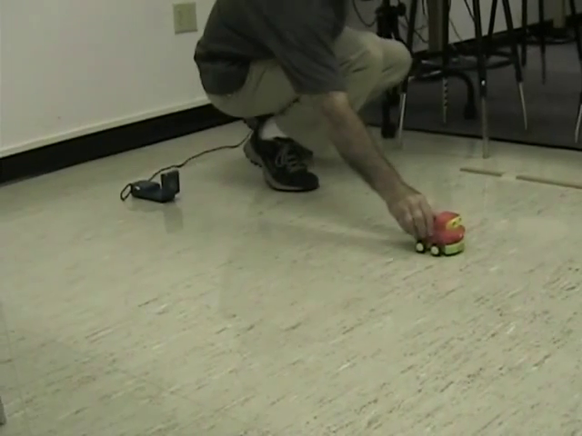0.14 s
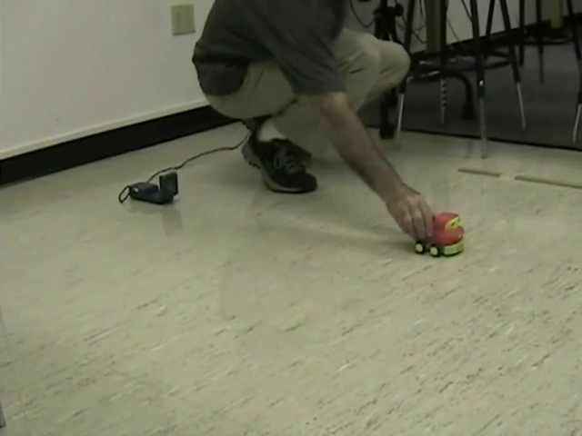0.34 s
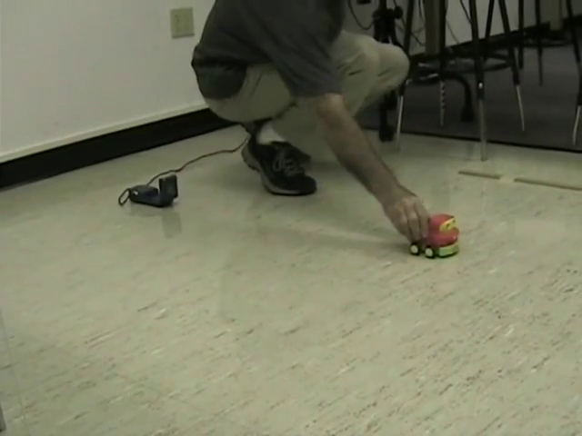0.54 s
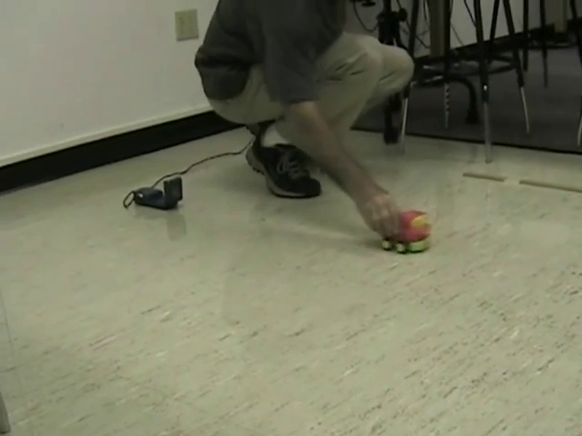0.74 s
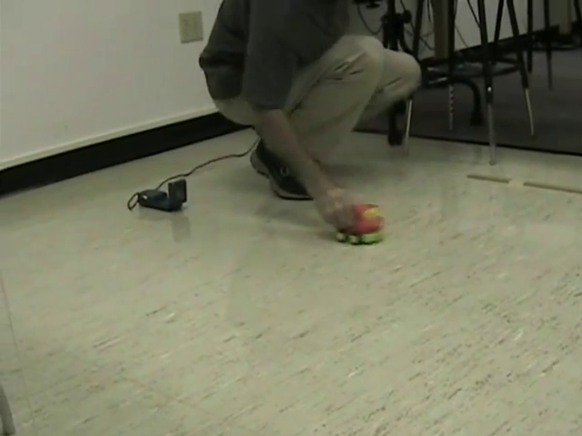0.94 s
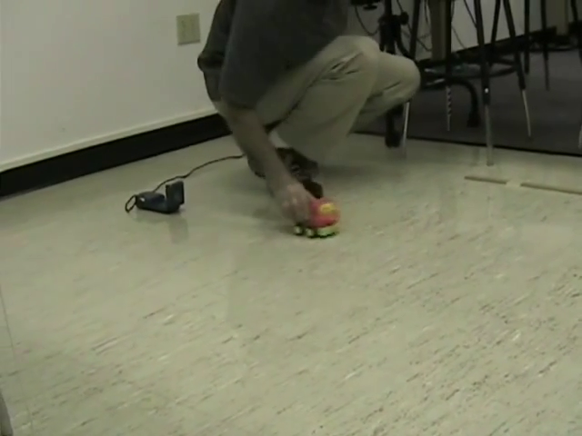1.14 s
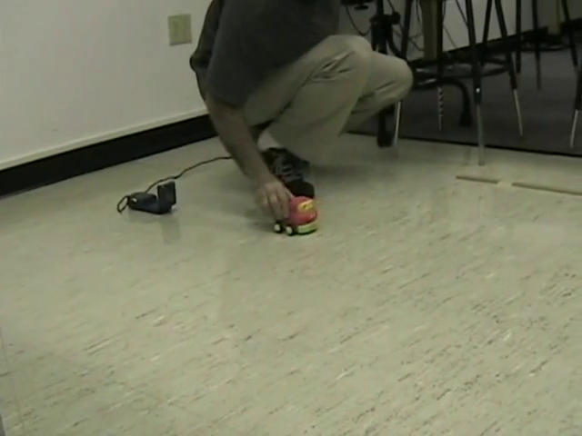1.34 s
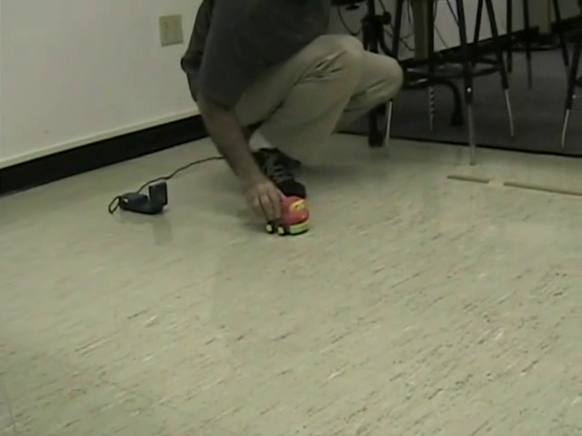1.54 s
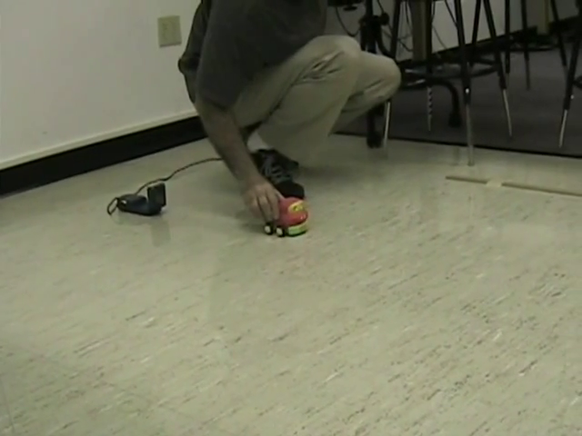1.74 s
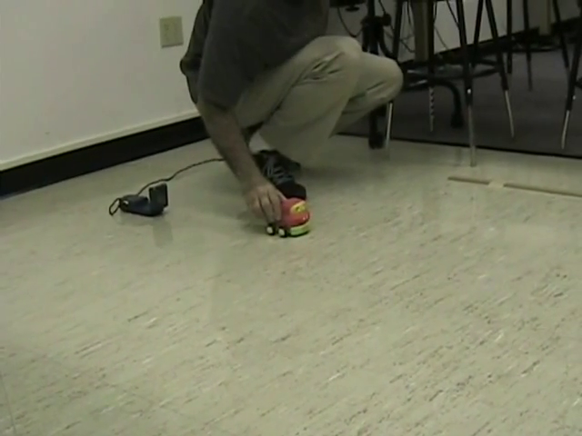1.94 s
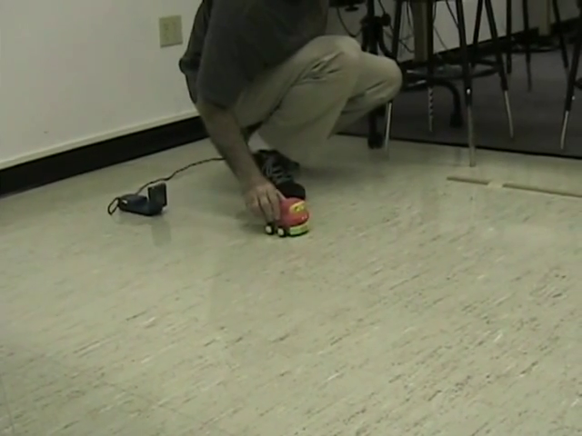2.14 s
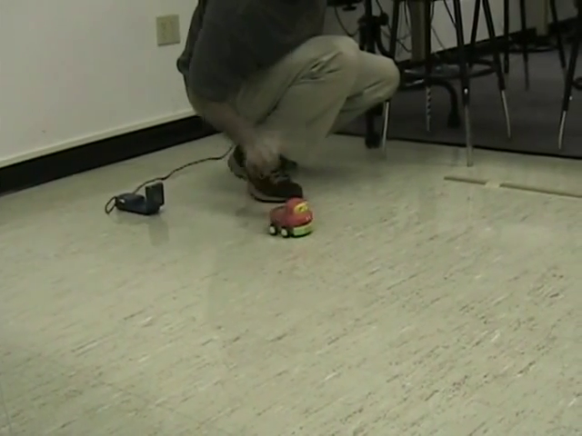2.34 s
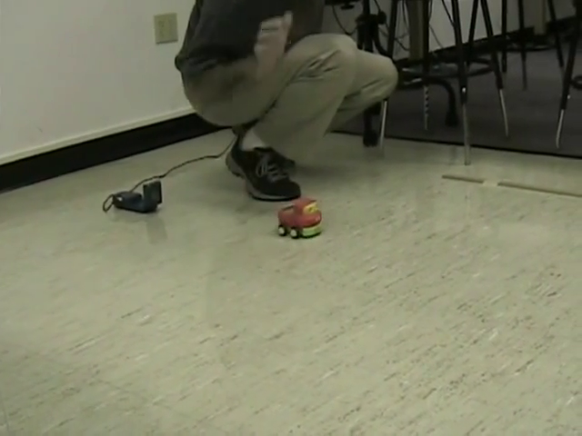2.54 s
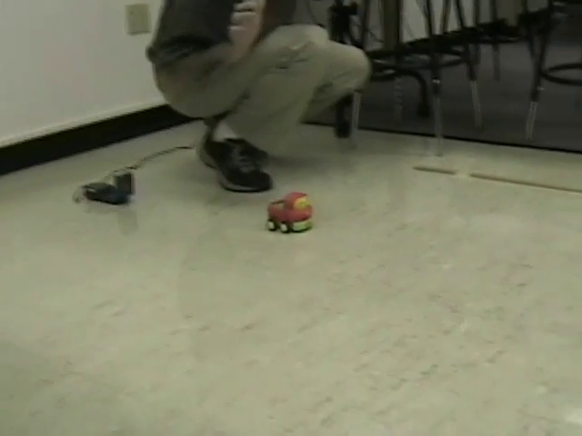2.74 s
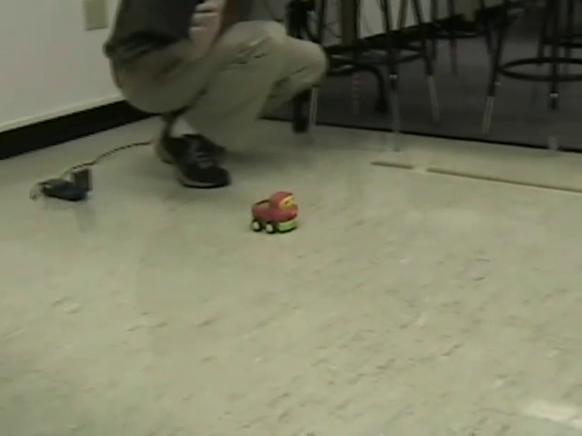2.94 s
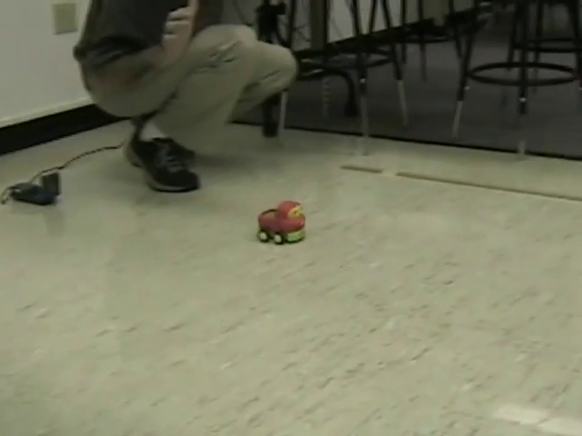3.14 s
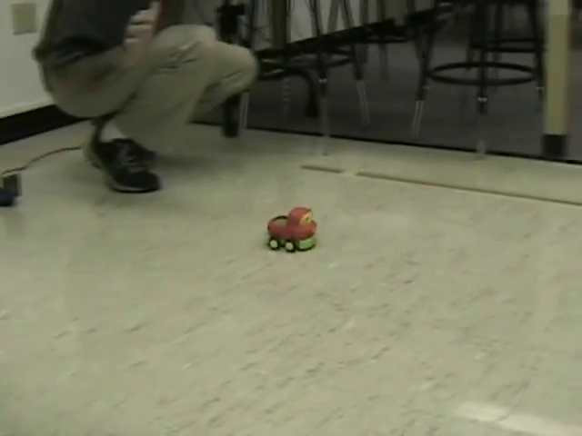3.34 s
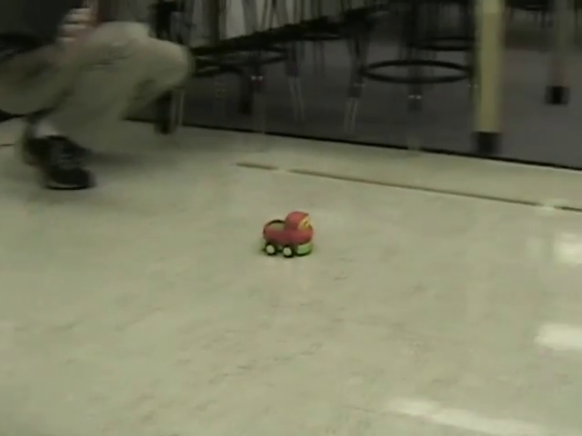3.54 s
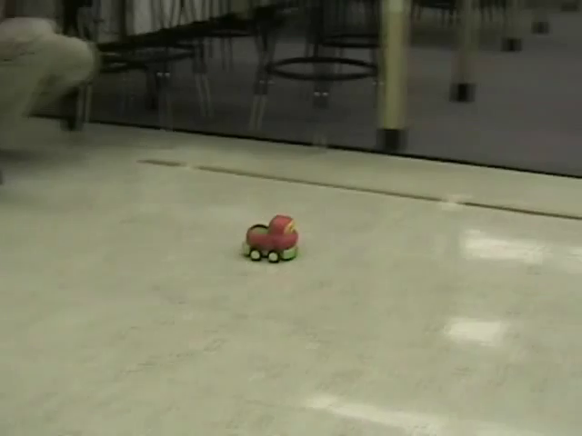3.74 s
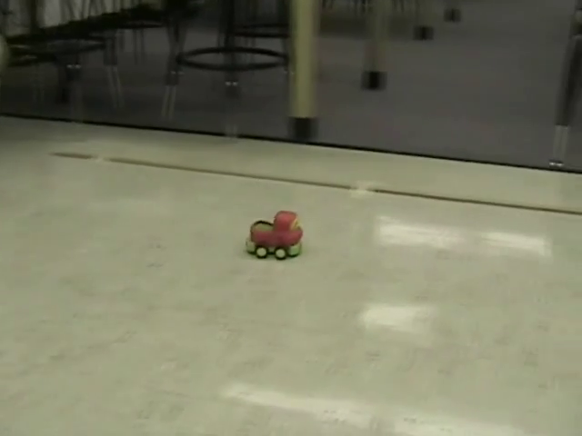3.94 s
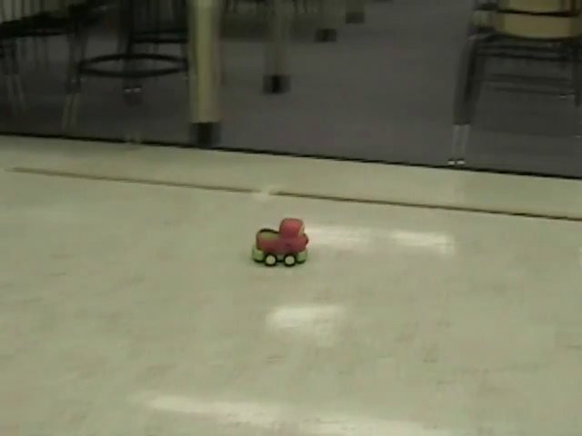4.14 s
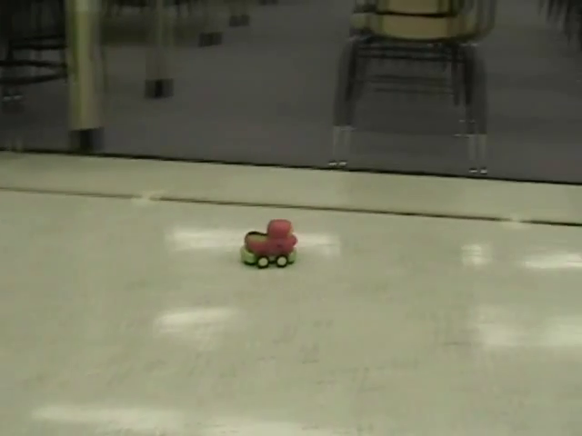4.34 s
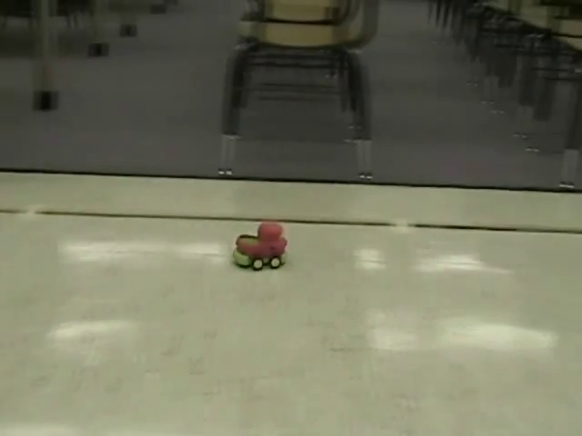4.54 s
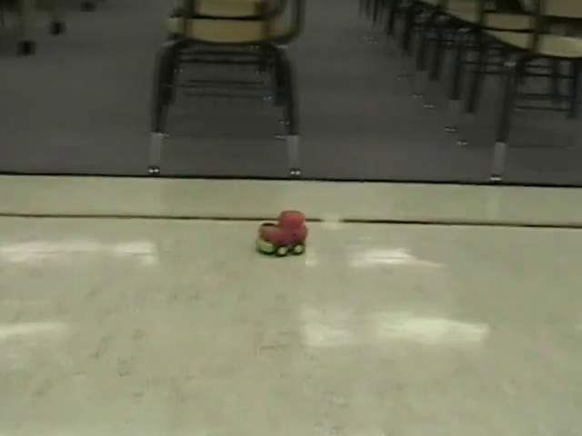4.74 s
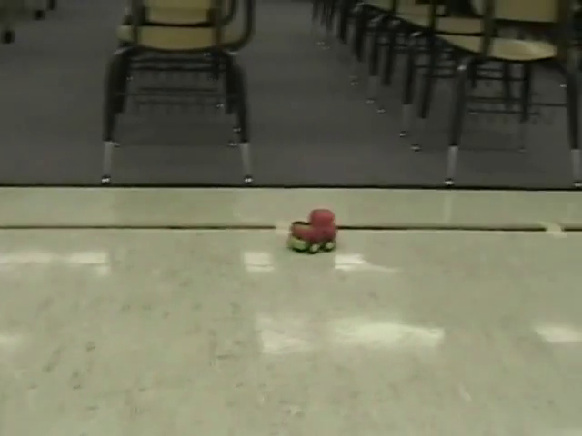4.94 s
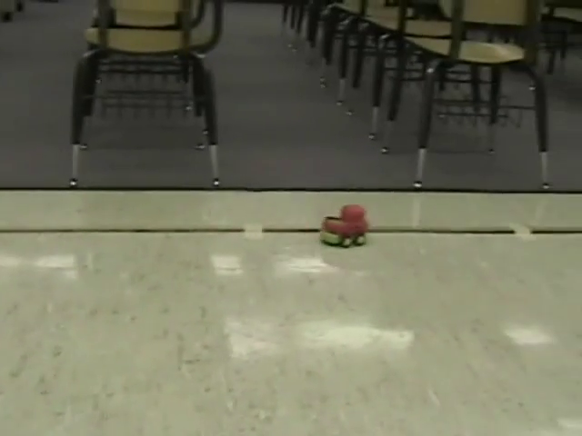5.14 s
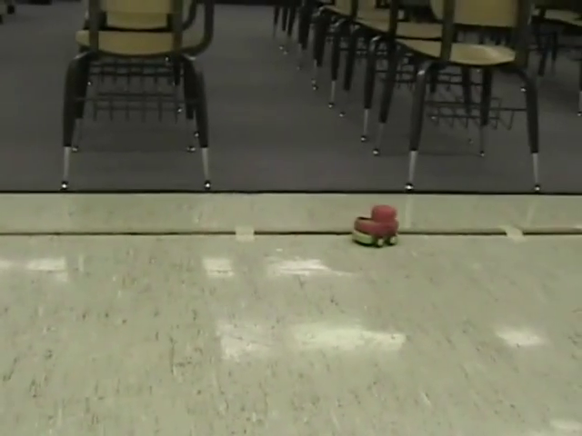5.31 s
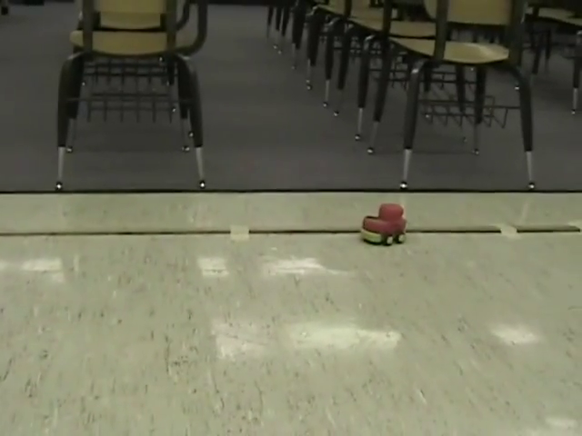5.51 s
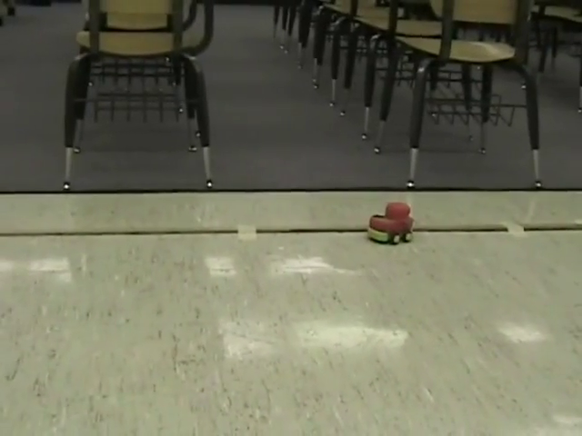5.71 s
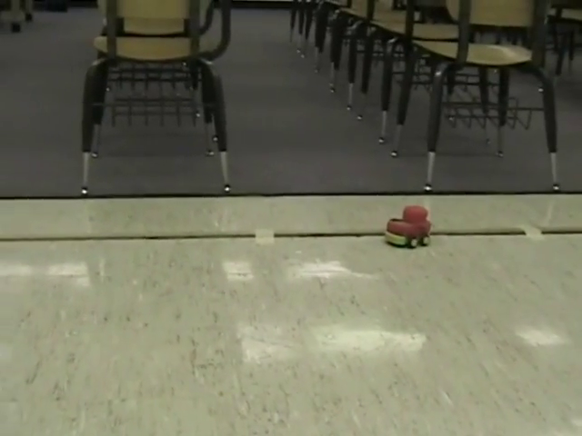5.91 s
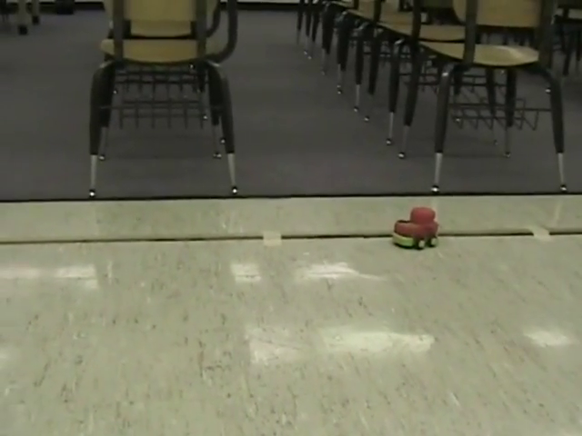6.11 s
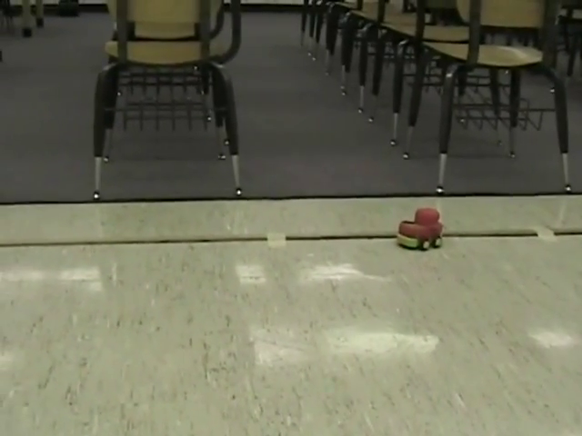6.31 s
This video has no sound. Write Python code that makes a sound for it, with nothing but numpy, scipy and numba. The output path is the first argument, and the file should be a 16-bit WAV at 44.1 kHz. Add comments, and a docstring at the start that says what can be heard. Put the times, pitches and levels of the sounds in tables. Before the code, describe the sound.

A bare classroom with a hard floor hisses with ventilation air over a wavering low hum, while the camera adds a thin high whine and, until about 2.4 seconds, faint regular ticks. From 0 to 0.3 seconds, light plastic knocks and a soft rustle mark a hand gripping a toy car. At 0.72 a loud, bright ratchet starts abruptly, speeds into a harsh buzzing rasp, then slows to separate snaps by 1.45. Only room sound remains until a dull double knock at 2.37. From 2.45 the gears clack singly, quicken and merge by about 2.8 into a throbbing, rattly whir. It rises to its fastest near 4.45, with patches of wheel rumble around 3.6, 4.7 and 5.4, then slows, the gears fading from 5.4 and rolling ending by 5.56. Short bright echoes follow. A small tick comes at 5.95, then a very faint rustle at 6.1.

```python
"""A bare classroom with a hard floor: ventilation air hisses, mains hum wavers, a camcorder whines and ticks.
After knocks on its body, a plastic pull-back car is dragged backwards: ratchet teeth give short noisy snaps.
Let go, its gears speed up from single clacks to a whir, each tooth a push that rings the plastic, while
filtered noise makes the wheels rumble. The car coasts, stops and gives a last tick. Fading noise makes the
room's echoes, and the camcorder's gain control turns loud moments down."""
import sys
import numpy as np
from scipy import signal
from scipy.fft import rfft, irfft
from scipy.io import wavfile
from numba import njit

SR = 44100
rng = np.random.default_rng(int(sys.argv[2]) if len(sys.argv) > 2 else 0)


def to_wav(sig):
    """Store sig (one row per channel, or 1-D mono) as 16-bit WAV at the path in sys.argv[1].

    Samples outside -1..1 are clipped; the rate is SR.
    """
    pcm = np.clip(np.atleast_2d(sig), -1, 1) * 32767
    pcm = np.round(pcm).astype(np.int16)
    wavfile.write(sys.argv[1], SR, pcm.T)  # frames by channels


N = 281005
TIME = np.arange(N) / SR  # seconds
SIDES = np.array([[1], [-1]])  # left, right

# Steady ventilation air, its tone colour. Each row: frequency in Hz, relative level in dB.
AIR_COLOUR = [(20, -34), (60, -12), (80, -12.5), (130, -9), (250, -7.5), (380, -15), (480, -9.5),
              (650, -16), (850, -15), (1800, -23), (4200, -28.5), (6300, -30), (7800, -41.5), (13500, -48)]
# How wide the air sounds. Each row: frequency in Hz, side against middle in dB.
AIR_SIDE = [(60, 7), (200, 0), (400, -7.5), (1300, -5.5), (4400, -10.5), (8000, 0), (13000, 3)]
# Mains hum and fan tones. Each row: frequency in Hz, level in dB before HUM_LEVEL and the wavering,
# left minus right in dB, phase of left minus right in radians.
HUM = [(120, -50.5, 8, 2.04), (243, -56.5, 8, 0.24), (359.3, -58, 3, 1), (465, -63, 7, 0.9),
       (538, -69.5, 20, .5), (807, -63.5, 2, .3), (1015, -62, 5, .3)]
# The hum grows as the camera turns. Each row: time in seconds, gain in dB.
HUM_LEVEL = [(1.3, -5.5), (2.3, -3), (6.3, 0.5)]
# The camera's whine. Each row: time in seconds, level in dB.
WHINE_LEVEL = [(0, -51.5), (.45, -68), (2.2, -63.5), (5.85, -57), (6.25, -65)]
# The camera's ticking, its tone colour. Each row: frequency in Hz, relative level in dB.
TICK_COLOUR = [(2000, -43), (4000, 19), (7500, -4), (9700, 6), (13000, -14)]

# Knocks of the plastic body as it is gripped, let go and settles.
# Each row: start in seconds, level in dB before colouring, brightness of the contact (low-pass edge) in Hz.
KNOCKS = [(.0222, -18, 6860), (0.0264, -12.5, 5000), (0.051, -24, 8000), (.125, -14, 1100),
          (0.292, -29, 9000), (2.363, -17.5, 2300), (2.379, -11.5, 1990), (5.9456, -15.5, 5000)]
# Tone colour of the knocks. Each row: frequency in Hz, relative level in dB.
KNOCK_COLOUR = [(300, -12), (1000, -11), (1450, -3.5), (2900, -9), (3500, -11), (4500, -5.5), (6800, -4),
                (8000, -16), (12000, -4)]
# What a knock rings with. Each row: frequency in Hz, width in Hz, added level in dB.
KNOCK_MODES = [(1790, 120, 8), (2740, 210, 15), (4400, 250, -8), (9400, 360, 4)]
# Soft rustles of movement. Each row: middle in seconds, half length in seconds, level in dB.
RUSTLE = [(.1, 0.18, -45.5), (6.102, .1, -53)]
# Tone colour of the rustles. Each row: frequency in Hz, relative level in dB.
RUSTLE_COLOUR = [(300, -3), (900, 4), (2000, -3.5), (5000, -11), (7500, -23), (11500, -33), (13500, -35)]

# Speed of the ratchet: the hand speeds up, then brakes. Each row: time in seconds, teeth per second.
PULL = [(.7241, 54), (.94, 147), (1.05, 158.6), (1.3, 128), (1.35, 62), (1.445, 23)]
# Tone colour of the ratchet. Each row: frequency in Hz, relative level in dB.
RATCHET_COLOUR = [(300, -41), (850, -23), (1020, -9.5), (1400, -15), (2100, -2.5), (3300, -5), (4100, 1.5),
                  (5000, 0), (5800, -5.5), (6600, -4.5), (7700, -18.5), (10500, -23.5), (13500, -32.5)]
# Resonances of the motor housing. Each row: frequency in Hz, width in Hz, added level in dB.
SHELL = [(1075, 58, -1), (2200, 280, -13), (3000, 280, -6), (3900, 47, -26), (5010, 150, -5)]

# Gear speed: the spring drives the car, then it coasts. Each row: time in seconds, teeth per second.
SPEED = [(2.4494, 26.3), (2.78, 55.7), (3.2, 116), (3.55, 155), (3.8, 180), (4.45, 250), (5.0, 190),
         (5.4, 130), (5.56, 65)]
# Tone colour of the single clacks. Each row: frequency in Hz, relative level in dB.
CLACK_COLOUR = [(500, -27), (1100, -15.5), (1500, -17.5), (1950, -1.5), (2300, -5.5), (2700, 3),
                (3100, -3.5), (3700, -7.5), (4300, -6.5), (5100, -4), (6000, -9), (6800, -11),
                (7800, -21.5), (13000, -34.5)]
# Tone colour of the running gears. Each row: frequency in Hz, relative level in dB.
GEAR_COLOUR = [(300, -25), (600, -18.5), (1050, -9), (1600, -4.5), (2200, -0.5), (2650, -3), (3500, -3),
               (4400, -1), (5600, -6), (6500, -10.5), (7800, -18.5), (9000, -16.5), (11100, -20.5),
               (13500, -38.5)]
# Panels of the body, each louder while it faces the microphone. Each row: frequency in Hz, width in Hz,
# time of facing in seconds, half length in seconds, added level in dB.
PANELS = [(1090, 250, 5.63, 0.46, 2.5), (2110, 155, 4.2, 0.5, .5), (2690, 1050, 4.73, 0.15, -3),
          (4070, 510, 3.73, 0.4, -1.5), (6480, 750, 4.94, 0.9, -0.5)]
# Tone colour of the wheels. Each row: frequency in Hz, relative level in dB.
WHEEL_COLOUR = [(100, -58), (180, -23.5), (245, 10), (300, 2), (380, 0.5), (600, -8.5), (800, -1.5),
                (1100, -17), (2000, -25)]
# Stretches of floor where the wheels rumble louder.
# Each row: middle in seconds, half length in seconds, boost in dB.
ROUGH_PATCHES = [(3.556, 0.23, 8.5), (4.687, .15, 7.5), (5.387, 0.11, 12.5)]

# How long the echoes last. Each row: frequency in Hz, seconds to fade by 60 dB.
ROOM_T60 = [(200, 0.95), (1000, 1.2), (2000, 0.87), (4000, 0.73), (8000, 0.53), (13000, 0.33)]
# How wide the echoes sound. Each row: frequency in Hz, side against middle in dB.
ROOM_SIDE = [(200, -11), (600, -10), (1300, -14.5), (4500, -12), (6500, -8.5), (8500, 2), (12000, 1.5)]

# Air: level, and left minus right
AIR_DB, AIR_PAN_DB = -48, 0.7
# Ratchet: basic snap level, extra force of the first tooth breaking loose, and how fast that extra dies
SNAP_DB, BREAKAWAY_DB, BREAKAWAY_S = 3, 5, 0.013
# The second pawl bites harder with speed: its level against the first at the fastest pull
SECOND_PAWL_DB = -0.5
# The snaps grow as the spring tightens: gain over the whole pull
WOUND_DB = 0.5
# Rattle after each snap at the fastest pull, and how much more at standstill
RATTLE_DB, SLOW_RATTLE_DB = -1.5, 4.5
# Slow teeth clack one by one; around this speed they merge into the whir
CLACK_DB, WHIR_DB, MERGE_TEETH_PER_S = -0.5, -3.5, 47.2
# Each clack bounces once
BOUNCE_S, BOUNCE_DB = .006, -4
# One gear runs out of true and presses harder once a turn: teeth per turn, tooth where it first binds
TURN_TEETH, TIGHT_TOOTH = 17.7, 7.2
# Depth of that throb with the spring fully wound, and the teeth that pass until the spring is slack
THROB_DB, SPRING_TEETH = 4, 240
# The teeth strike softer as the car slows: change at standstill
COAST_DB = -2
# The gears fall quiet just before the car stops
GEARS_STOP_S, GEARS_FADE_DB_PER_S = 5.384, 214
# Wheels: level at top speed on smooth floor, and growth with each doubling of speed
ROLL_DB, ROLL_DB_PER_OCTAVE = -47, 10.5
# The camcorder passes nothing much above this
TOP_HZ = 13800


def amp(db):
    """Turn decibels into a gain."""
    return 10 ** (np.asarray(db) / 20)


def curve(table):
    """Read a time table at every sample, with straight lines between its rows."""
    rows = np.array(table)
    return np.interp(TIME, rows[:, 0], rows[:, 1])


def at_hz(table, hz):
    """Read a frequency table on a logarithmic axis, as the ear hears pitch."""
    f, value = np.transpose(table)
    return np.interp(np.log(np.maximum(hz, 1)), np.log(f), value)


def swell(at_s, half_s):
    """A smooth rise and fall around one moment."""
    return np.exp(-((TIME - at_s) / half_s) ** 2)


def noise():
    """White noise with an average strength (rms) of 1."""
    return rng.standard_normal(N)


def convolve(x, response):
    """Let every sample of a sound set off the same response."""
    return signal.fftconvolve(x, response)[:N]


def colour(x, spectrum, size=4096):
    """Give a sound a tone colour, with a filter of unit energy that answers at once."""
    cepstrum = irfft(np.log(amp(at_hz(spectrum, np.fft.rfftfreq(size, 1 / SR)))))
    # fold the second half onto the first, so nothing sounds before its push
    cepstrum[1:size // 2] *= 2
    cepstrum[size // 2 + 1:] = 0
    response = irfft(np.exp(rfft(cepstrum)))
    return convolve(x, response / np.linalg.norm(response))


def band(x, hz, width_hz):
    """One resonance, with gain 1 at its centre."""
    return signal.lfilter(*signal.iirpeak(hz, hz / width_hz, fs=SR), x)


def ring(x, modes):
    """A push together with the resonances that it wakes."""
    return x + sum(amp(db) * band(x, hz, width) for hz, width, db in modes)


def impulses(times, sizes):
    """Single pushes at the given moments."""
    samples = np.clip(np.round(times * SR).astype(int), 0, N - 1)
    return np.bincount(samples, sizes, N)


def chatter(pushes, decay_s, db):
    """After each push the loose parts go on rattling for a moment, as fading noise."""
    fade = np.exp(-TIME / decay_s)
    power = np.maximum(convolve(pushes ** 2, fade / fade.sum()), 0)
    return pushes + amp(db) * np.sqrt(power) * noise()


def stereo(mid, side, width):
    """Left and right from middle and side, the side weighted by frequency."""
    weight = amp(at_hz(width, np.fft.rfftfreq(2 * N, 1 / SR)))
    weighted_side = irfft(rfft(side, 2 * N) * weight)[:N]
    return mid + SIDES * weighted_side


def classroom():
    """Steady ventilation air is coloured noise; mains hum and fan tones are slowly wavering sines."""
    air = stereo(colour(noise(), AIR_COLOUR), colour(noise(), AIR_COLOUR), AIR_SIDE) * amp(AIR_DB)
    hum = 0
    for hz, db, pan_db, lag in HUM:
        # one slow random drift moves both level (in dB) and phase
        sway = np.interp(TIME, np.linspace(0, TIME[-1], 20), rng.standard_normal(20))
        phase = 2 * np.pi * hz * TIME + .3 * sway + SIDES * lag / 2
        level = amp(db + sway + SIDES * pan_db / 2)
        hum = hum + np.sqrt(2) * level * np.sin(phase)
    return air * amp(SIDES * AIR_PAN_DB / 2) + hum * amp(curve(HUM_LEVEL))


def camera():
    """The camcorder's thin whine is narrow noise; until it pans, rattling pushes tick faintly and regularly."""
    whine = band(band(noise(), 5740, 240), 5740, 240)
    whine = whine / whine.std() * amp(curve(WHINE_LEVEL))
    tick_times = np.arange(.01, 2.45, .05)
    ticks = impulses(tick_times, np.ones(len(tick_times)))
    ticks = colour(chatter(ticks, decay_s=0.00071, db=11.5), TICK_COLOUR)
    return whine + amp(-42) * ticks


def knocks():
    """Light knocks ring the plastic body; a softer contact gives a duller knock."""
    pushes = 0
    for s, db, edge_hz in KNOCKS:
        contact = chatter(impulses(np.array([s]), amp([db])), decay_s=0.002, db=4.5)
        pushes = pushes + signal.lfilter(*signal.butter(4, edge_hz, fs=SR), contact)
    return ring(colour(pushes, KNOCK_COLOUR), KNOCK_MODES)


def rustle():
    """Clothes brush softly before the pull and after the run: noise that swells and fades."""
    level = sum(amp(db) * swell(s, half_s) for s, half_s, db in RUSTLE)
    return colour(noise(), RUSTLE_COLOUR) * level


def passed(speed):
    """Number of teeth that have passed since the gear began to turn."""
    turning = (TIME > speed[0][0]) * (TIME < speed[-1][0])
    return np.cumsum(curve(speed) * turning) / SR


def teeth(speed, offset, jitter, scatter_db):
    """A push of size near 1 for each passing tooth, uneven in time (jitter in teeth) and force."""
    hits = np.flatnonzero(np.diff(np.ceil(passed(speed) - offset)) > 0) + 1
    shift, force = rng.standard_normal((2, len(hits)))
    times = TIME[hits] + jitter * shift / curve(speed)[hits]
    return impulses(times, amp(scatter_db * np.clip(force, -2, 2)))


def disperse(x, spread_s):
    """Bending waves cross plastic faster in the treble, so each push arrives slightly drawn out."""
    hz = np.fft.rfftfreq(2 * N, 1 / SR)
    delay_s = spread_s * np.exp(-hz / 4000)
    phase = 2 * np.pi * np.cumsum(delay_s) * hz[1]
    return irfft(rfft(x, 2 * N) * np.exp(-1j * phase))[:N]


def winding():
    """Two pawls slip over the ratchet in turn while the spring is wound, each tooth snapping and rattling."""
    pace = curve(PULL) / curve(PULL).max()
    first = teeth(PULL, 0, jitter=.02, scatter_db=1.0)
    second = teeth(PULL, .5, jitter=.05, scatter_db=2.0) * amp(SECOND_PAWL_DB) * pace
    breakaway = np.exp(-np.maximum(TIME - PULL[0][0], 0) / BREAKAWAY_S)
    wound = passed(PULL) / passed(PULL)[-1]  # 0 to 1
    pushes = (first + second) * amp(SNAP_DB + BREAKAWAY_DB * breakaway + WOUND_DB * wound)
    snaps = chatter(pushes, decay_s=0.001, db=1.5)  # each snap is a short scrape
    rattle_db = RATTLE_DB + SLOW_RATTLE_DB * (1 - pace)
    rattle = chatter(pushes, decay_s=0.002, db=rattle_db) - pushes
    return ring(colour(disperse(snaps + rattle, spread_s=0.00124), RATCHET_COLOUR), SHELL)


def clacking():
    """Share of the teeth's energy in single clacks: near 1 at the start, near 0 once the gears are fast."""
    top_so_far = np.maximum.accumulate(curve(SPEED))
    return 1 / (1 + (top_so_far / MERGE_TEETH_PER_S) ** 20)


def release():
    """The freed gears clack tooth by tooth, and each tooth bounces once."""
    first = teeth(SPEED, 0, jitter=.005, scatter_db=.4) * amp(CLACK_DB) * np.sqrt(clacking())
    bounce = amp(BOUNCE_DB) * np.roll(first, round(BOUNCE_S * SR))
    rattle = chatter(first + bounce, decay_s=.0026, db=4.5)
    return colour(disperse(rattle, spread_s=0.001375), CLACK_COLOUR)


def tooth_force():
    """Strength of the whir: it throbs once a turn while the spring is tense, eases in coasting, then fades."""
    count, rate = passed(SPEED), curve(SPEED)
    tension = np.clip(1 - (count / SPRING_TEETH) ** 2, 0, 1)
    throb_db = THROB_DB * tension * np.cos(2 * np.pi * (count - TIGHT_TOOTH) / TURN_TEETH)
    coast_db = COAST_DB * (1 - rate / np.maximum.accumulate(rate))
    fade_db = GEARS_FADE_DB_PER_S * np.maximum(TIME - GEARS_STOP_S, 0)
    return amp(WHIR_DB + throb_db + coast_db - fade_db) * np.sqrt(1 - clacking())


def running():
    """The gear train whirs with the car's speed; play between the gears adds a weaker tap between teeth."""
    main = teeth(SPEED, 0, jitter=.014, scatter_db=1.4)
    taps = amp(-9) * teeth(SPEED, .7, jitter=.15, scatter_db=3)
    pushes = (main + taps) * tooth_force()
    # slow teeth have time to bounce, so more of their energy goes into rattle
    rattle_db = -5 + 10 * np.log2(200 / curve(SPEED))
    rattle = chatter(pushes, decay_s=0.0019, db=rattle_db)
    rattle = rattle / np.hypot(1, amp(rattle_db))  # same energy at any speed
    whir = ring(colour(disperse(rattle, spread_s=0.00057), GEAR_COLOUR), SHELL)
    panels = sum(amp(db) * swell(s, half_s) * band(whir, hz, width) for hz, width, s, half_s, db in PANELS)
    return whir + panels


def wheels():
    """Small hard wheels rumble over the grain of the tiles, louder with speed and on rough patches."""
    rate = curve(SPEED)
    rolling = (TIME > SPEED[0][0]) * (TIME < SPEED[-1][0])
    floor_db = sum(db * swell(s, half_s) for s, half_s, db in ROUGH_PATCHES)
    speed_db = ROLL_DB_PER_OCTAVE * np.log2(rate / rate.max())
    return colour(noise(), WHEEL_COLOUR) * amp(ROLL_DB + speed_db + floor_db) * rolling


def shadow(x, edge_hz, treble_db):
    """The motor sits under the car, so the top treble of the direct sound is weakened."""
    hz = np.fft.rfftfreq(2 * N, 1 / SR)
    treble_share = 1 - 1 / (1 + (hz / edge_hz) ** 8)
    return irfft(rfft(x, 2 * N) * amp(treble_db * treble_share))[:N]


def room(x, wet_db, early_db, early_s):
    """Echoes as middle and side: furniture scatters early ones, hard walls keep a tail, shorter in the treble."""
    hz, s, spectra = signal.stft(rng.standard_normal((2, SR)), SR, nperseg=256)
    fade = np.exp(-np.log(1000) * s / at_hz(ROOM_T60, hz)[:, None])
    fade = fade * (1 + amp(early_db) * np.exp(-s / early_s))
    onset = np.clip(TIME[:SR] / 0.003 - 1, 0, 1)  # silent for 3 ms, full after 6 ms
    tails = signal.istft(spectra * fade, SR)[1][:, :SR] * onset
    return np.array([convolve(x, amp(wet_db) * tail / np.linalg.norm(tail)) for tail in tails])


def travelling(x, speed, wet_db, early_db, early_s, count):
    """Each stretch of the car's path wakes its own pattern of echoes, blending into the next."""
    moments = np.linspace(speed[0][0], speed[-1][0], count)
    shares = (np.interp(TIME, moments, place) for place in np.eye(count))
    return sum(room(x * np.sqrt(share), wet_db, early_db, early_s) for share in shares)


def scene():
    """The car's direct sound and its echoes, in the humming room with the rustles and the camera."""
    pull, clacks, taps, run = winding(), release(), knocks(), running() + wheels()
    direct = shadow(pull + clacks + taps + run, edge_hz=14700, treble_db=-7)
    mid, side = (travelling(pull, PULL, wet_db=-2.5, early_db=0, early_s=0.0048, count=3)
                 + room(clacks, wet_db=-3, early_db=-17, early_s=0.011)
                 + room(taps, wet_db=-6.5, early_db=3, early_s=0.012)
                 + travelling(run, SPEED, wet_db=-2, early_db=-8.0, early_s=0.0017, count=12))
    return direct + stereo(mid, side, ROOM_SIDE) + rustle() + classroom() + camera()


def comb(x, memory, depth):
    """Against its motor tone the camcorder subtracts a mean of past cycles: a row of narrow notches."""
    motor_hz = 299.2
    delay = np.exp(-2j * np.pi * np.fft.rfftfreq(2 * N, 1 / SR) / motor_hz)  # one motor cycle
    past_mean = (1 - memory) * delay / (1 - memory * delay)
    return irfft(rfft(x, 2 * N) * (1 - depth * past_mean))[:, :N]


@njit
def follow(power, attack, recover):
    """Follow the loudness, rising quickly and sinking slowly."""
    out, e = np.empty(len(power)), 0.
    for i in range(len(power)):
        e += (power[i] - e) * (attack if power[i] > e else recover)
        out[i] = e
    return out


def record(dry, threshold_db=-11.5, attack_s=0.013, recover_s=.25):
    """Gain control holds loud sound, and the room with it, to a threshold; peaks clip and the top is cut."""
    sound = comb(dry, memory=.66, depth=.8)
    power = follow(np.mean(sound ** 2, axis=0), 1 / (attack_s * SR), 1 / (recover_s * SR))
    gain = 1 / np.sqrt(np.maximum(power / amp(threshold_db) ** 2, 1))
    clipped = np.clip(sound * gain, -1, 1)
    top_cut = signal.ellip(8, .2, 70, TOP_HZ, fs=SR, output="sos")
    return signal.sosfilt(top_cut, clipped)


dry = scene()
out = record(dry)
to_wav(out)
```